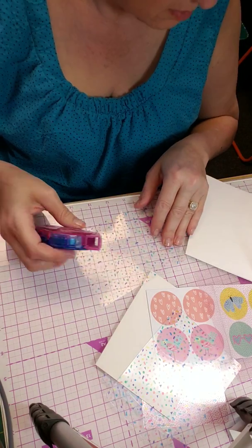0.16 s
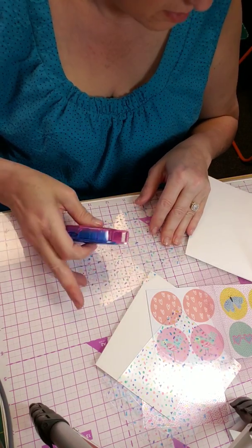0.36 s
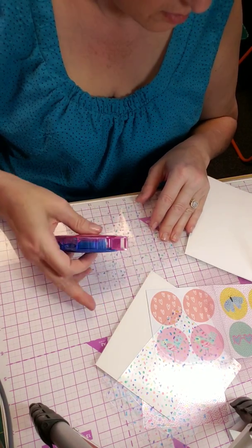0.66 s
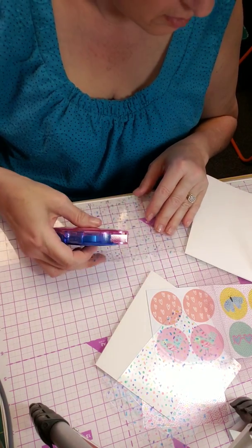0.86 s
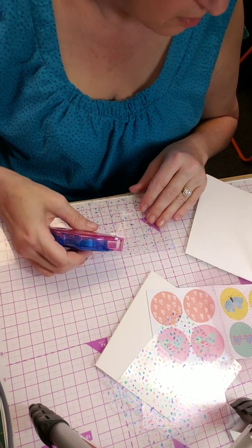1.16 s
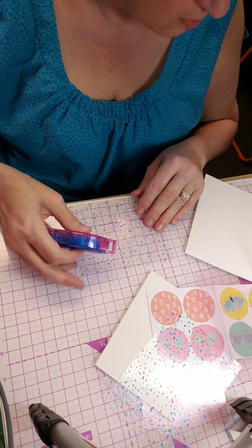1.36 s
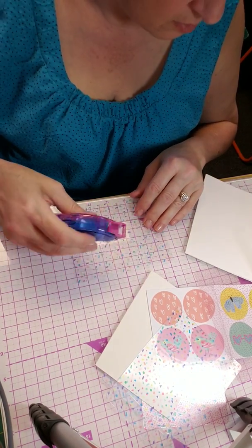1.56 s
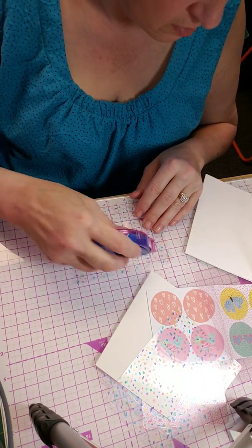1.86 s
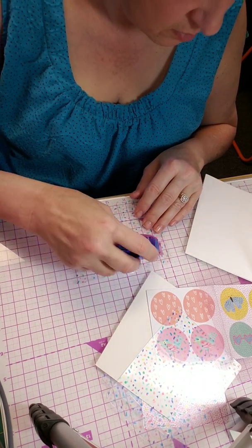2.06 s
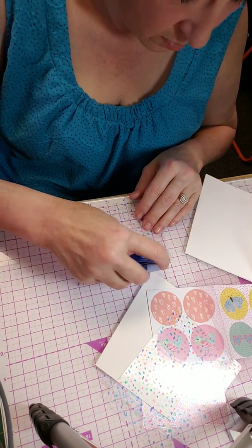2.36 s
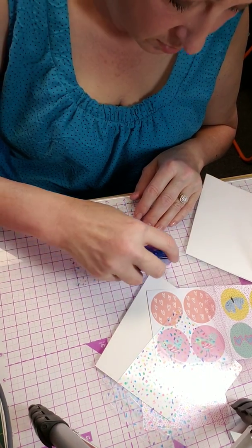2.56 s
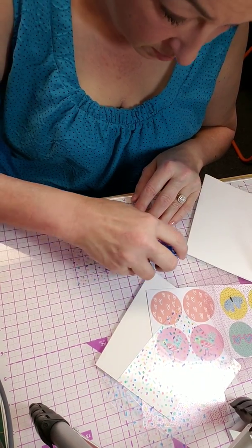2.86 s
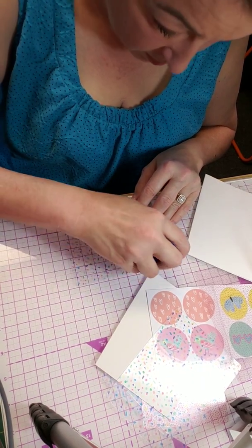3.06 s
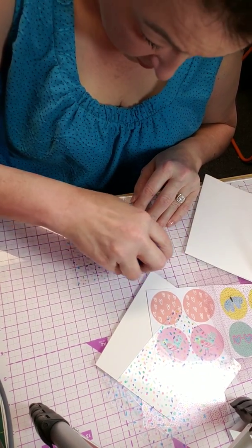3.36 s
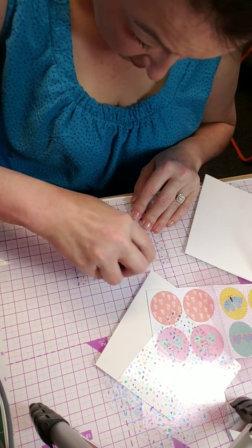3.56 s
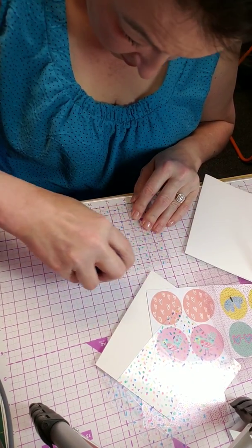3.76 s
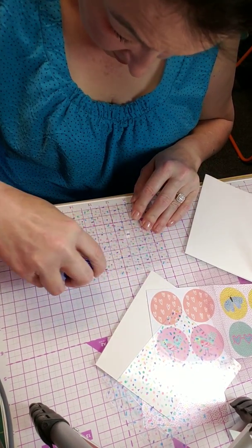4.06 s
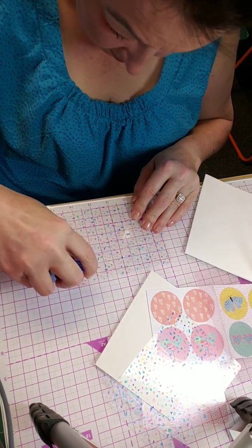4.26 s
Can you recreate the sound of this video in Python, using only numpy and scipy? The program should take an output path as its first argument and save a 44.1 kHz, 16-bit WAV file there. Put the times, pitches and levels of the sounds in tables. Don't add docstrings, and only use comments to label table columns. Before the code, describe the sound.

A small plastic tape runner is handled quietly, taps down on a craft mat, then zips along with rapid gear clicks.

```python
import sys
import numpy as np
from scipy import signal
from scipy.fft import rfft, irfft, next_fast_len
from scipy.io import wavfile
from scipy.ndimage import uniform_filter1d

SR = 44100
rng = np.random.default_rng(int(sys.argv[2]) if len(sys.argv) > 2 else 0)


def amplitude_ratio(level_db):
    exponent = np.asarray(level_db, float) / 20
    return 10 ** exponent


def to_wav(sig):
    pcm = np.clip(np.atleast_2d(sig), -1, 1) * 32767
    pcm = np.round(pcm).astype(np.int16)
    wavfile.write(sys.argv[1], SR, pcm.T)


N = 194428


def evened(x):
    return x / np.sqrt(np.mean(x ** 2) + 1e-20)


def read(points, hz):
    f, value = np.transpose(points)
    return np.interp(np.log(hz + 1), np.log(f + 1), value)


def add(mix, start_s, sound):
    part = mix[:, round(start_s * SR):][:, :sound.shape[1]]
    part += sound[:, :part.shape[1]]


def curve_db(rows):
    s, db = np.transpose(rows)
    return np.interp(np.arange(N) / SR, s, db, -120, -120)


def high_pass(x, hz):
    return signal.sosfilt(signal.butter(6, hz, "high", fs=SR, output="sos"), x)


def pair(left, other, same):
    same = np.clip(same, -1, 1)[:, None]
    return np.array([left, same * left + np.sqrt(1 - same ** 2) * other])


def noise(spectrum, likeness, patchy_db, size=1024):
    frames, hz = 4 * N // size + 5, np.fft.rfftfreq(size, 1 / SR)
    a, b, c, d, patches = rng.standard_normal((frames, len(hz), 5)).T
    patches = uniform_filter1d(patches, size=8, axis=0)
    patches = evened(uniform_filter1d(patches, size=10, axis=1))
    bins = pair(a + 1j * b, c + 1j * d, read(likeness, hz))
    bins = bins * amplitude_ratio(read(spectrum, hz)[:, None] + patchy_db * patches)
    return evened(signal.istft(bins, nperseg=size, noverlap=3 * size // 4)[1][:, :N])


def specks(per_s, spread_db, most, blur):
    size = amplitude_ratio(spread_db * np.minimum(rng.exponential(1, N), most))
    return evened(uniform_filter1d(size * (rng.random(N) < per_s / SR), size=blur))


def resonate(x, hz, width_hz):
    turn = np.exp(2j * np.pi * np.cumsum(hz * np.ones(x.shape[1])) / SR)
    r = np.exp(-np.pi * width_hz / SR)
    return 2 * (turn * signal.lfilter([1 - r], [1, -r], x / turn)).real


def ring(modes, scatter_db=4.0, loose=0.6, alike_hz=2800, count=6, length=1000):
    spread, detune = 0.05, 0.015
    hz, db, t60_s = np.repeat(np.transpose(modes), count, axis=1)[:, None, :, None]
    t, k = np.arange(length) / SR, np.arange(hz.size)[:, None]
    chance = rng.standard_normal((6, hz.size, 1))
    cluster = spread * np.sin(2.4 * k ** 2)
    path = np.array([np.sin(1.7 * k ** 2), np.cos(2.9 * k ** 2)]) + loose * chance[3:5]
    phase = 1.67 * np.sin(3.3 * k ** 2) + loose * chance[5] + np.minimum(hz / alike_hz, 1.2) * path
    swing_up = 1 - np.exp(-1.5 * hz * t)
    weight = amplitude_ratio(db + scatter_db * chance[1:3] - 60 * t / t60_s) * swing_up
    return (weight * np.sin(2 * np.pi * hz * (1 + cluster + detune * chance[0]) * t + phase)).sum(1)


def blow(parts, blow_db, parts_db, trims_db, chatters_s, count=60):
    out, rise_s = np.zeros((2, 2400)), 0.0004
    when, size = rng.random((count, 2)).T
    strength = 0.62 * (2 * size - 1) * np.exp(-2.2 * when)
    for modes, part_db, trim_db, chatter_s in zip(parts, parts_db, trims_db, chatters_s):
        contacts = np.zeros(400)
        contacts[np.minimum(when ** 1.3 * chatter_s * SR, 399).astype(int)] = strength
        contacts[int(rise_s * SR)] = 1
        part = signal.fftconvolve(ring(modes), contacts[None], axes=1)
        loudest = np.sqrt(uniform_filter1d((part ** 2).mean(0), size=200).max())
        add(out, 0, amplitude_ratio(blow_db + part_db + trim_db) * part / loudest)
    return out


# frequency in Hz, level in dB per Hz.
RUMBLE = [(12, -56), (20, -15), (30, -19.5), (37, -4), (64, -1), (109, -4.5), (125, -7), (141, -13),
          (172, -18), (218, -15), (259, -20.5), (307, -25.5), (340, -36), (600, -44.5), (780, -67.5),
          (1320, -120)]
# frequency in Hz, level in dB per Hz.
HISS = [(240, -26.5), (400, -1.5), (553, -5.5), (742, -4), (906, -8), (979, -6), (1290, -6.5), (1400, -6),
        (1510, -8), (2320, -6), (3160, -6.5), (7170, -4.5), (9040, -10), (14800, -4), (16000, -10)]
# frequency in Hz, left-right likeness from -1 to 1.
FLOOR_LIKENESS = [(60, 0.99), (180, 0.87), (550, 0.13), (1650, 0.13), (4970, -0.25), (15000, 0.17)]


def floor():
    rumble_db, hum_db, hiss_db = -58, -17.5, -73
    leaning_db, thump_db, thump_s = 1.5, 4, 0.1
    lull_s, lull_length_s, lull_db = 0.68, 0.26, -3
    rumble = noise(RUMBLE, FLOOR_LIKENESS, 0.5, size=4096)
    hum = evened(resonate(rumble, 56, 3.6))
    t = np.arange(N) / SR
    after = np.maximum(t - LANDING[0][0], 0)
    load_db = (after > 0) * (leaning_db + thump_db * np.exp(-after / thump_s))
    load_db = load_db + lull_db * np.exp(-((t - lull_s) / lull_length_s) ** 2)
    heave = amplitude_ratio(rumble_db + uniform_filter1d(load_db, size=1000))
    return heave * (rumble + amplitude_ratio(hum_db) * hum) + amplitude_ratio(hiss_db) * noise(HISS, FLOOR_LIKENESS, 0.98)


# start in seconds, length in seconds, level in dB,
# centre in Hz, upper band over lower in dB.
RUBS = [
    [(0.0, 0.078, -71.5, 4530, 3), (.09, 0.048, -70, 5000, 3), (.225, .11, -70.5, 3800, 3),
     (.33, 0.25, -85.5, 4280, 8)],
    [(.545, 0.031, -67, 4500, -5), (.571, 0.049, -49, 4540, -17), (.63, 0.17, -58.5, 4640, -11),
     (.735, 0.12, -60.5, 3880, -12), (.85, 0.15, -60.5, 3900, -2), (.922, 0.018, -55, 4260, 4),
     (.98, .12, -69, 4100, 0), (1.12, 0.063, -64, 4170, 3.5), (1.255, 0.053, -65.5, 4300, 6),
     (1.28, 0.088, -54.5, 4080, -6), (1.378, 0.022, -49, 3830, -9), (1.41, 0.089, -75, 4100, -2),
     (1.55, .06, -74.5, 4500, 2)],
    [(2.31, 0.051, -76, 5200, 4), (2.335, 0.047, -52, 5250, -10), (2.4, .1, -82, 5300, 8)],
]
# lower width in Hz, upper band in Hz, upper width in Hz.
GRIPS = [(1300, 6960, 3500), (1400, 6800, 4000), (600, 6500, 2700)]


def fingers():
    rise, hold, fall_db = 0.17, 0.65, 21
    out = np.zeros((2, N))
    grain = rng.standard_normal((2, N)) * (0.5 + 0.25 * specks(700, 6.5, 4, 40))
    for rub, (width_hz, upper_hz, upper_width_hz) in zip(RUBS, GRIPS):
        start, length, db, hz, upper_db = np.transpose(rub)[:, :, None]
        span = slice(round(rub[0][0] * SR), round((rub[-1][0] + 2 * rub[-1][1]) * SR))
        u = (np.arange(N)[span] / SR - start) / length
        slide = np.clip(u / rise, 0, 1) * amplitude_ratio(db - 6.5 - fall_db * np.maximum(u - hold, 0)) + 1e-9
        centre_hz = uniform_filter1d((slide * hz).sum(0) / slide.sum(0), size=800)
        lower = resonate(resonate(grain[:, span], centre_hz, width_hz), centre_hz, width_hz)
        lower = evened(high_pass(lower, 3100))
        upper = grain[:, span]
        for stage in range(4):
            upper = evened(resonate(upper, upper_hz, upper_width_hz))
        out[:, span] = np.linalg.norm(slide, axis=0) * lower
        out[:, span] += np.linalg.norm(slide * amplitude_ratio(upper_db), axis=0) * upper
    return out


# frequency in Hz, level in dB, t60 in seconds.
CAVITY = [(751, 18, 0.041), (1030, -5, .03)]
SHELL = [(834, -21, 0.018), (1132, -1.5, 0.016), (1283, 7, 0.02), (1523, 11, 0.017), (1950, 1.5, 0.016),
         (2440, -6.5, .01)]
WALLS = [(2976, -3, 0.011), (3171, 2.5, 0.025), (3440, 2, 0.014), (3874, 0.6, 0.021), (4300, 3.5, 0.011),
         (4636, 2, 0.013), (5200, -1.5, 0.013)]
RIBS = [(5860, 2.5, 0.0058), (6560, 1.5, 0.015), (7020, -1.5, 0.0038), (7600, 4, 0.011),
        (8680, -3.5, 0.0073)]
PAWL = [(10400, -6, 0.011), (11580, -1, 0.0099), (12200, 0, 0.0041), (13150, 1.5, 0.0076),
        (14100, 0.5, 0.013), (14400, -21, 0.0028)]
# start in seconds, level in dB, ribs over walls in dB.
TICKS = [
    (0.101, -62.5, 11.5),
    (0.232, -66, 7),
    (0.257, -62, -2),
    (0.332, -69, -6),
    (0.551, -62, 2),
    (0.573, -51.5, -3),
    (0.609, -59, 2),
    (0.712, -51, 3.5),
    (1.389, -50, 1),
    (2.361, -65, 20),
]
# start in seconds, level in dB, shell over cavity in dB.
CREAKS = [(2.938, -65.5, -9), (2.966, -65.5, -7), (3.039, -68, -3), (3.062, -66.5, 12), (3.078, -84, 12),
          (3.093, -65.5, 19), (3.114, -60, 20.5), (3.127, -57, 11), (3.139, -63, 18), (4.352, -72.5, 24),
          (4.398, -69, 13)]


def handling():
    tick_cavity_db, tick_shell_db, creak_walls_db, creak_ribs_db = -35, -19, -0.5, 0
    trims_db, chatters_s = [-1.0, -8.5, -2.5, -8.0], [0.003] * 4
    out = np.zeros((2, N))
    seam = RIBS + [(hz, db - 13, t60_s) for hz, db, t60_s in PAWL]
    for s, db, ribs_db in TICKS:
        parts_db = [tick_cavity_db, tick_shell_db, 0, ribs_db]
        add(out, s, blow([CAVITY, SHELL, WALLS[3:], seam], db, parts_db, trims_db, chatters_s, count=6))
    for s, db, slip_db in CREAKS:
        parts_db = [-slip_db / 2, slip_db / 2, creak_walls_db, creak_ribs_db]
        add(out, s, blow([CAVITY, SHELL, WALLS, seam], db, parts_db, trims_db, chatters_s, count=10))
    return high_pass(out, 650)


# frequency in Hz, left-right likeness from 0 to 1.
RUNNER_LIKENESS = [(60, 0.78), (180, 0.59), (550, 0.9), (1650, 0.091), (4970, 0.063), (15000, 0.072)]


def snaps(rows, spectrum, rattle, t60_s):
    size = 2048
    out, t = np.zeros((2, N)), np.arange(size) / SR
    gain_db = np.maximum(read(spectrum, abs(np.fft.fftfreq(size, 1 / SR))), -60)
    colour = np.fft.ifft(np.exp(np.conj(signal.hilbert(np.log(amplitude_ratio(gain_db)))))).real
    likeness = read(RUNNER_LIKENESS, np.fft.rfftfreq(size, 1 / SR))
    for s, peak_db in rows:
        left, other = rfft(rng.standard_normal((2, size)) * amplitude_ratio(-60 * t / t60_s))[:, :, None]
        strike = rattle * irfft(pair(left, other, likeness)[:, :, 0])
        strike[:, 40] = 1
        snap = signal.fftconvolve(strike, colour[None], axes=1)
        add(out, s, amplitude_ratio(peak_db) * snap / abs(snap).max())
    return out


# start in seconds, peak in dB.
UNSTICK = [
    (0.573, -48),
]
# frequency in Hz, level in dB per Hz.
UNSTICK_COLOUR = [(2200, -48), (4000, -3), (9000, -4), (14500, 0), (16000, -11.5)]


def fingertip():
    return snaps(UNSTICK, UNSTICK_COLOUR, rattle=0.4, t60_s=0.19)


# start in seconds, peak in dB.
NAIL = [
    (0.893, -51.5),
    (0.927, -30),
]
# frequency in Hz, level in dB per Hz.
NAIL_COLOUR = [(180, -69), (420, -13), (725, -2), (885, -9), (1690, -4.5), (2100, 3), (3080, -5), (4750, 2),
               (5430, -9), (6300, -3.5), (9550, -17.5), (12300, -17), (16000, -23)]


def nail():
    return snaps(NAIL, NAIL_COLOUR, rattle=0.13, t60_s=0.09)


# start in seconds, peak in dB.
LANDING = [
    (2.85, -27),
    (2.856, -50),
    (2.864, -31),
    (2.874, -37.5),
]
# frequency in Hz, level in dB per Hz.
LANDING_COLOUR = [(240, -27), (400, -22), (553, -29), (719, -6.5), (1070, -12), (1560, -2), (1870, -19),
                  (3120, -4), (3420, -14.5), (4110, -9), (7280, -11.5), (10500, -23), (13100, -17),
                  (15300, -27), (16000, -58)]


def landing():
    return snaps(LANDING, LANDING_COLOUR, rattle=0.99, t60_s=0.039)


# frequency in Hz, level in dB, t60 in seconds.
TABLE = [(56.6, -5, 0.11), (105, 5, 0.044), (171, 3.5, 0.092), (292, 8.5, 0.033), (366, -3, 0.11)]


def table():
    out = np.zeros((2, N))
    knock = ring(TABLE, scatter_db=3.0, loose=0.19, alike_hz=9100, count=1, length=9000)
    add(out, LANDING[0][0], amplitude_ratio(-44.5) * knock)
    return out


# time in seconds, cavity level in dB.
GROAN = [(2.92, -78), (3.024, -80), (3.114, -68.5), (3.282, -70), (3.34, -69), (3.668, -62), (3.94, -68),
         (4.18, -74.5), (4.22, -90.5)]


def groan():
    top_limit_db, easing_db_per_s = -69.5, 10.5
    rub = noise([(200, 0.01), (1200, 0.0071)], RUNNER_LIKENESS, 4.5)
    cavity = evened(resonate(resonate(rub, 735, 62), 735, 62))
    top = evened(resonate(resonate(rub, 300, 160), 300, 160))
    cavity_db = curve_db(GROAN) - 0.5
    limit_db = top_limit_db - easing_db_per_s * (np.arange(N) / SR - 3.1)
    return amplitude_ratio(cavity_db) * cavity + amplitude_ratio(np.minimum(cavity_db + 19, limit_db)) * top


# tooth number, gap to the next tooth in ms.
PACE = [(0, 32.92), (1, 25.42), (6, 16.41), (12, 19.88), (14, 16.75), (27, 14.47), (30, 18.89), (45, 19.63),
        (51, 25.6)]
PINION_MS = [.05, -.06, -.91, -.91, -.08, 1.91]


def tooth_times():
    first_tooth_s, spool_teeth, spool_ms, spool_phase = 3.1773, 4.903, 1.27, 0.337
    k = np.arange(PACE[-1][0] + 1)
    gap_ms = np.interp(k, *np.transpose(PACE)) + np.resize(PINION_MS, len(k))
    gap_ms = gap_ms + spool_ms * np.sin(2 * np.pi * k / spool_teeth + spool_phase)
    return first_tooth_s + np.append(0, np.cumsum(gap_ms)) / 1000


# time in seconds, grind in dB.
ROLL = [
    (3.05, -76),
    (3.17, -63.5),
    (3.19, -40),
    (3.35, -34),
    (3.6, -34.5),
    (3.85, -35),
    (4.05, -36),
    (4.172, -39),
    (4.21, -72.5),
]
# frequency in Hz, level in dB per Hz.
GRIND = [(180, -55), (300, -24), (398, -35), (737, -23), (900, -30), (1120, -11.5), (1500, 1.5),
         (1720, -1.5), (2520, -2.5), (3290, 6), (5700, 0.5), (7440, -2), (9090, -5), (13800, -6.5),
         (16000, -38)]


def roller():
    teeth_s = tooth_times()
    climb = np.interp(np.arange(N) / SR, teeth_s, np.arange(len(teeth_s))) % 1
    settle_db = -2.5 * climb + 3 * climb ** 8
    swell = amplitude_ratio(curve_db(ROLL) - 2.0 + settle_db)
    grit = 0.67 + 0.2 * specks(2500, 2.4, 3, 30)
    return swell * noise(GRIND, RUNNER_LIKENESS, 2.8, size=256) * grit


# time in seconds, pull in dB, press on the shell in dB,
# flick of the pawl in dB.
STROKE = [(3.177, -37.5, 0.5, -0.5), (3.26, -33, 4, -3.5), (3.39, -38.5, 4, -3), (3.52, -33.5, -0.5, -2.5),
          (3.6, -36, 5.5, -4), (3.67, -32.5, 2, -2), (3.88, -35, -3.5, -6), (4.05, -38.5, 5.5, 3.5),
          (4.165, -35.5, -3, -3.5)]


def ratchet():
    shell_db, ribs_db, pawl_db, tooth_scatter_db = -11, -1, 1.5, 0.82
    trims_db, chatters_s = [4.76, 4.17, 5.5, 5.36], [0.004, 0.0075, 0.007, 0.0065]
    out, times, stroke = np.zeros((2, N)), tooth_times(), np.transpose(STROKE)
    pull, press, flick = (np.interp(times, stroke[0], column) for column in stroke[1:])
    parts_db = np.transpose([shell_db + press, 0 * pull, ribs_db + flick, pawl_db + flick])
    parts_db = parts_db + tooth_scatter_db * rng.standard_normal(parts_db.shape)
    for s, pull_db, tooth_db in zip(times, pull, parts_db):
        add(out, s, blow([SHELL, WALLS, RIBS, PAWL], pull_db, tooth_db, trims_db, chatters_s))
    return high_pass(out, 960)


# frequency in Hz, t60 in seconds.
ROOM = [(300, 0.17), (1300, 0.17), (4000, 0.14), (12000, 0.14)]


def echoes():
    taps = np.zeros((2, SR // 3))
    at = np.arange(160, SR // 3 - 10, 10)
    at = at + rng.integers(0, 10, (2, len(at)))
    np.put_along_axis(taps, at, rng.choice([-1., 1.], at.shape), 1)
    hz, t, bins = signal.stft(taps, SR, nperseg=128)
    bins = pair(*bins, read(RUNNER_LIKENESS, hz)) * amplitude_ratio(-60 * t / read(ROOM, hz)[:, None])
    tail = signal.istft(bins, SR, nperseg=128)[1]
    return tail / np.linalg.norm(tail[0])


def room(x, count=3):
    turn = 2 * np.pi * 17 * np.arange(N) / SR
    shares = [np.sqrt(2 / count) * np.cos(turn - np.pi * k / count) ** 2 for k in range(count)]
    return sum(signal.oaconvolve(x * share, echoes(), axes=1)[:, :N] for share in shares)


# frequency in Hz, left minus right in dB.
LEAN = [(60, -15), (180, 5), (550, 2), (1650, 0), (4970, 3.5), (15000, -2)]


def scene():
    runner = fingers() + handling() + fingertip() + nail() + landing() + table() + groan()
    runner = runner + roller() + ratchet()
    heard = runner + amplitude_ratio(-9.0) * room(runner)
    size = next_fast_len(N, True)
    port = amplitude_ratio(read(LEAN, np.fft.rfftfreq(size, 1 / SR)) / 2)
    return irfft(rfft(heard, size) * np.array([port, 1 / port]), size)[:, :N] + floor()


def top_cut(x):
    return signal.sosfilt(signal.butter(12, 16360, fs=SR, output="sos"), x)


def record(dry):
    cut = signal.sosfilt(signal.butter(3, 42, "high", fs=SR, output="sos"), dry)
    edge = signal.firwin(301, 15750, window=("kaiser", 9), fs=SR)
    mix = signal.oaconvolve(cut, edge[None], "same")
    return top_cut(mix)


dry = scene()
out = record(dry)
to_wav(out)
```